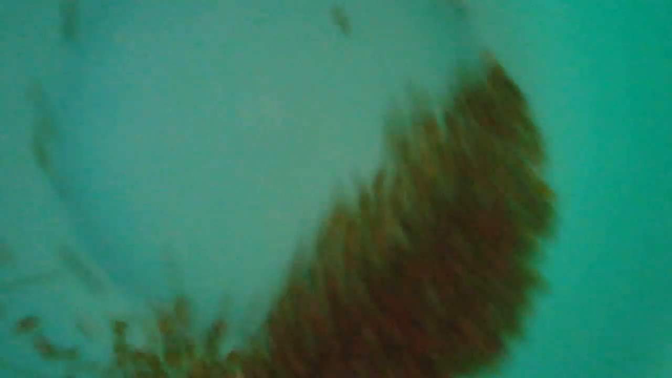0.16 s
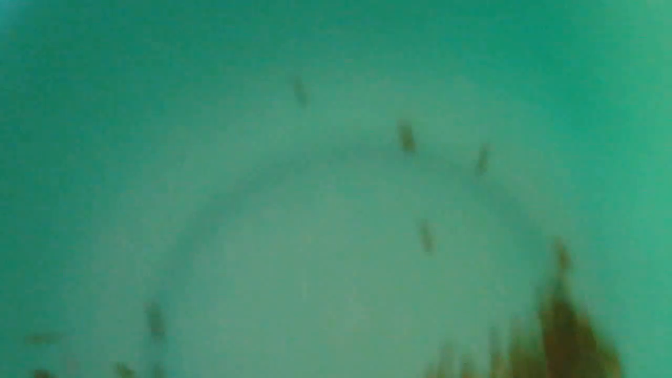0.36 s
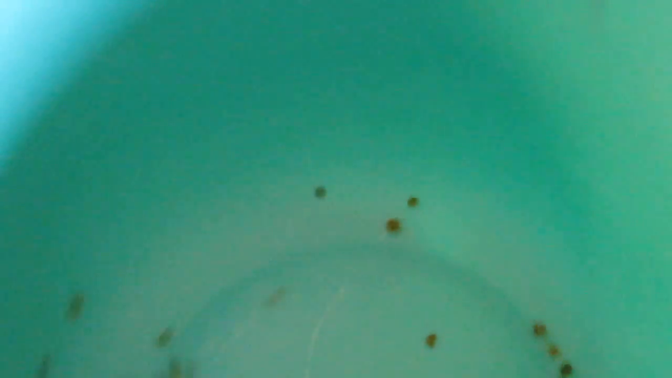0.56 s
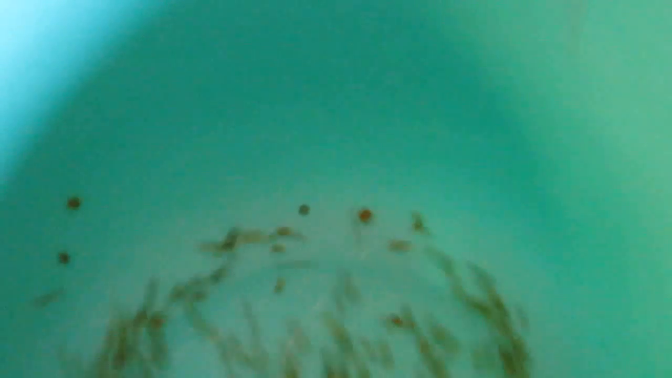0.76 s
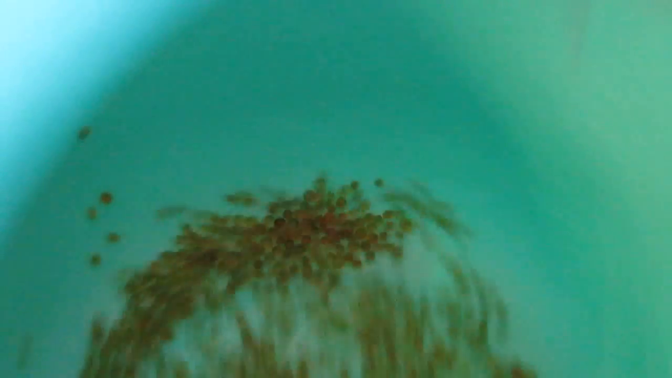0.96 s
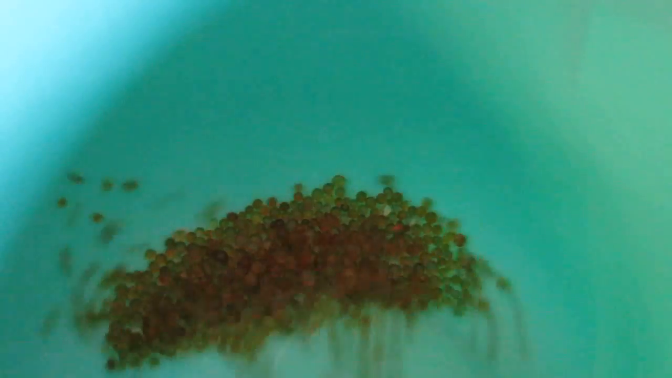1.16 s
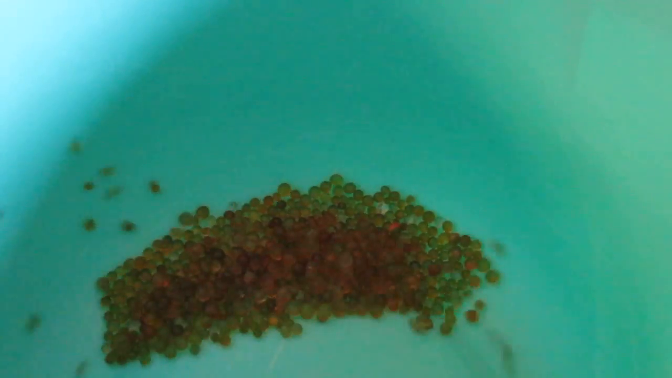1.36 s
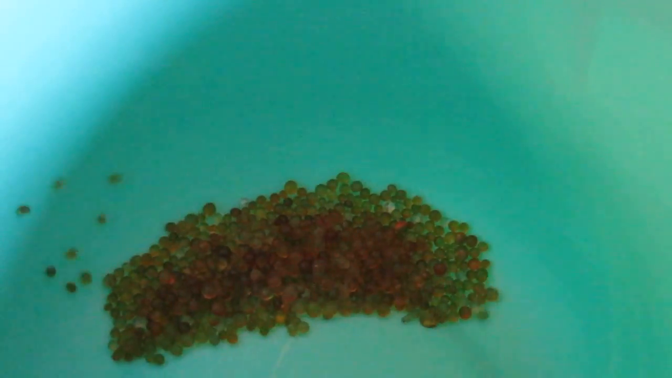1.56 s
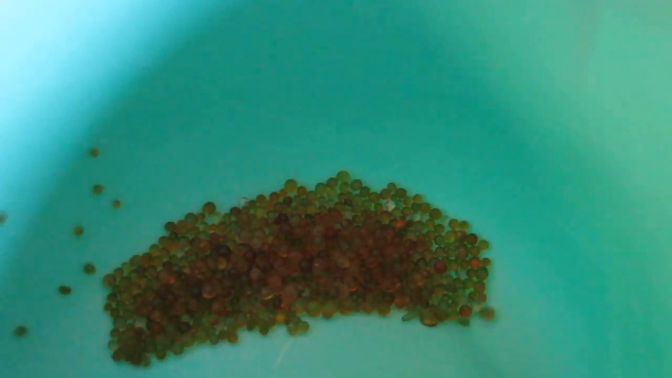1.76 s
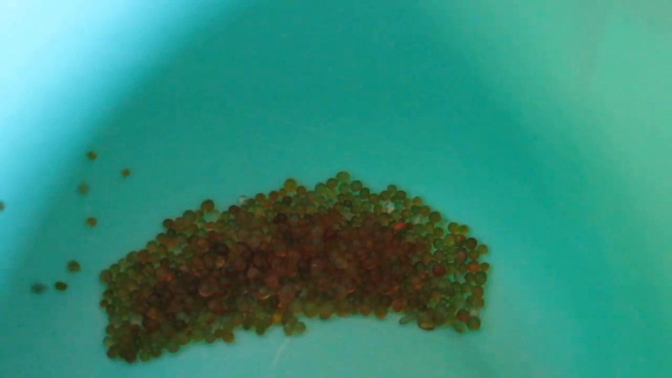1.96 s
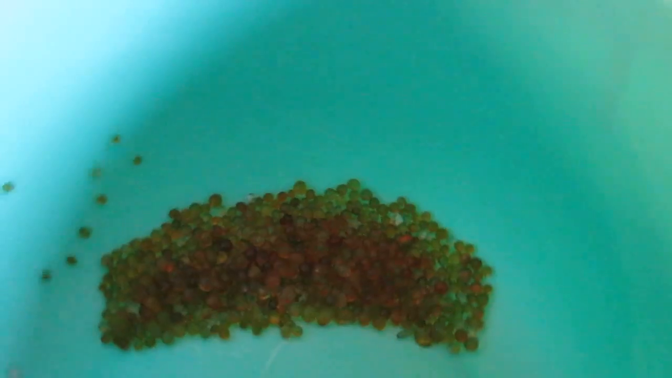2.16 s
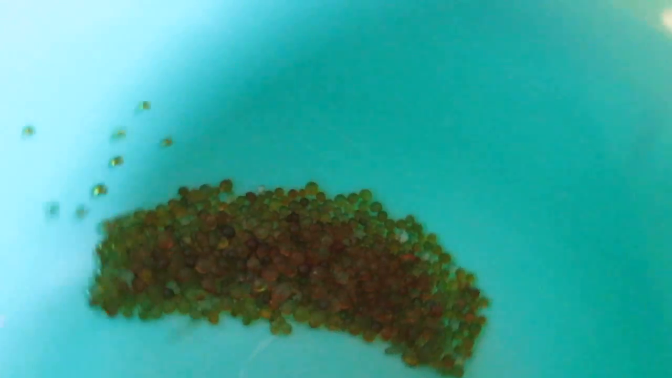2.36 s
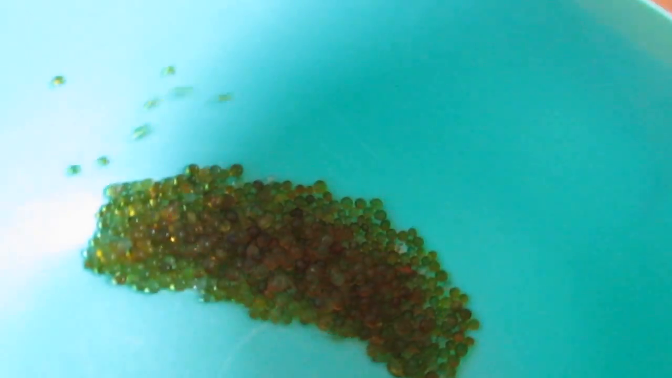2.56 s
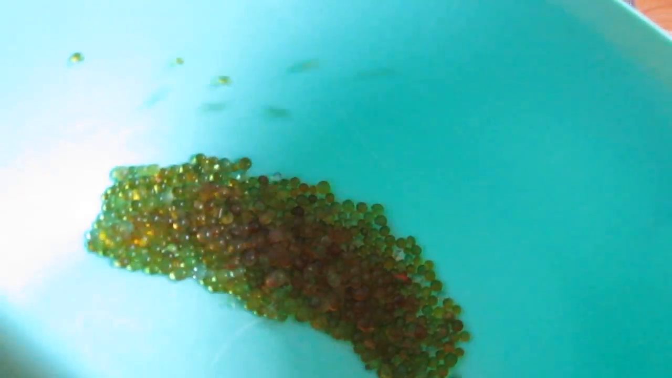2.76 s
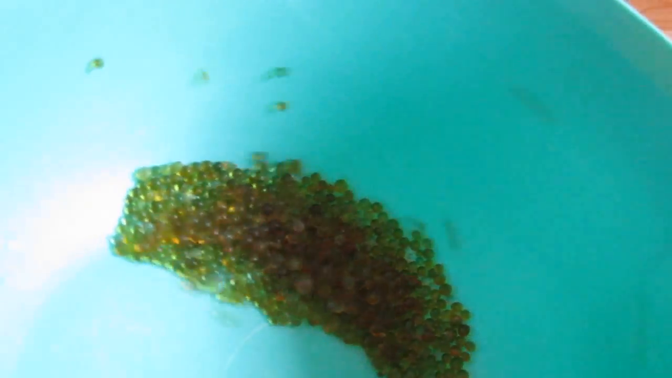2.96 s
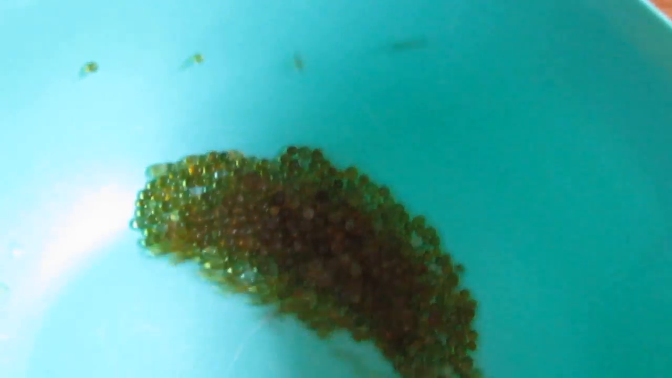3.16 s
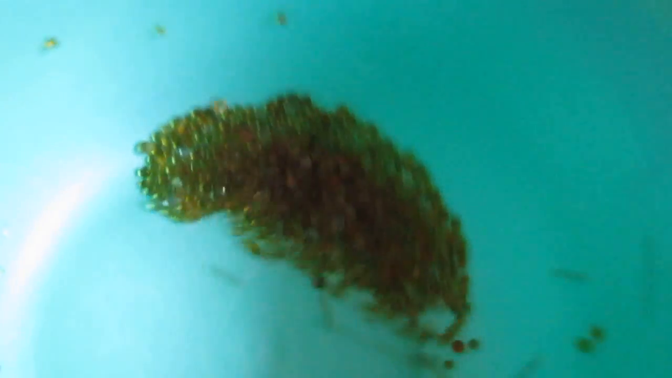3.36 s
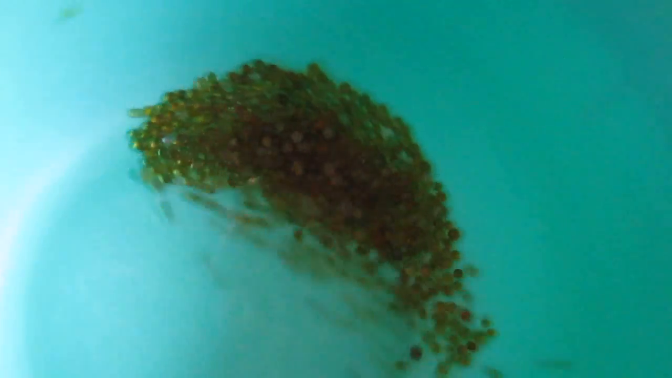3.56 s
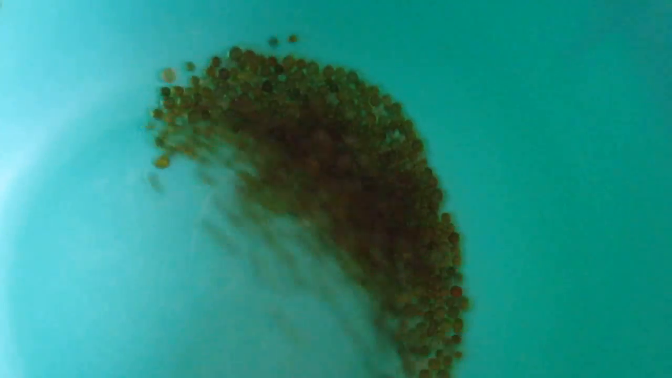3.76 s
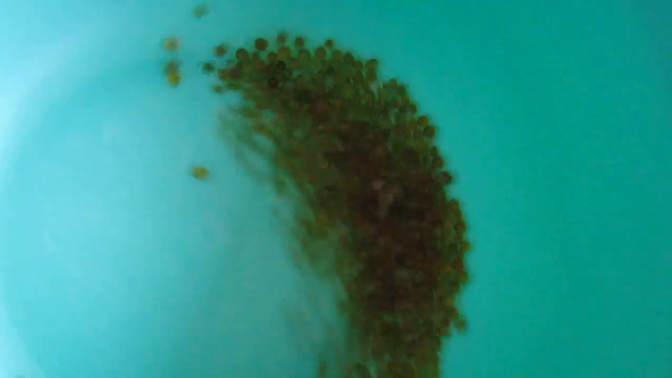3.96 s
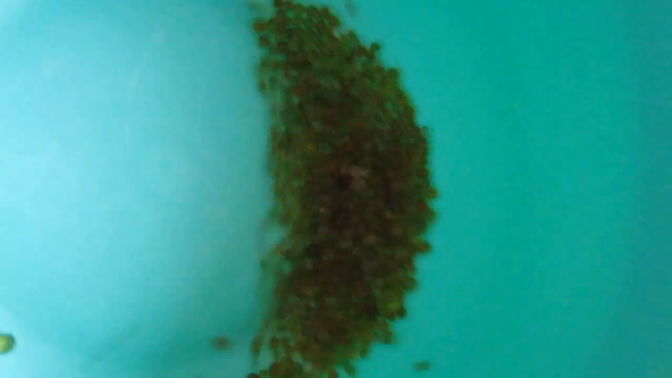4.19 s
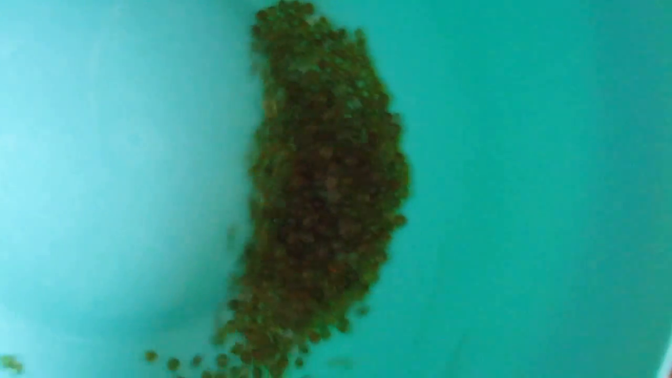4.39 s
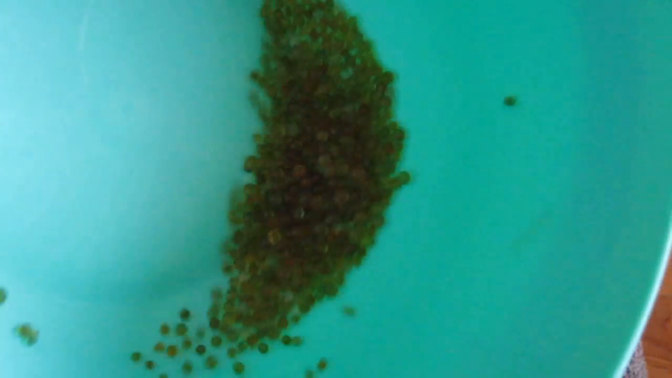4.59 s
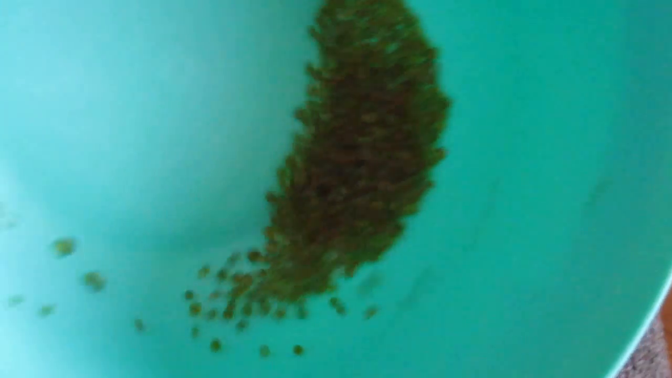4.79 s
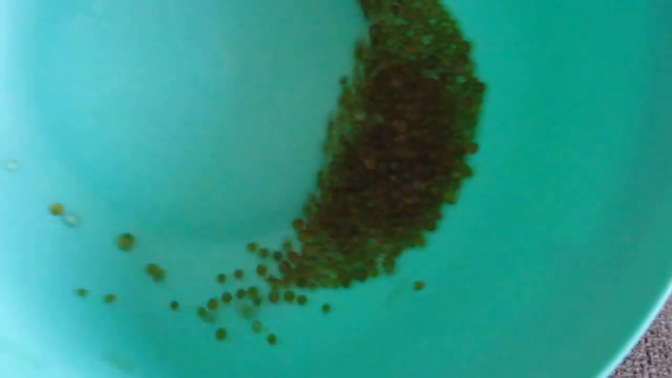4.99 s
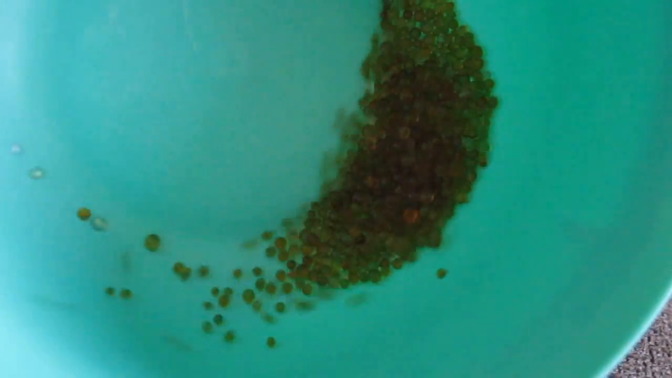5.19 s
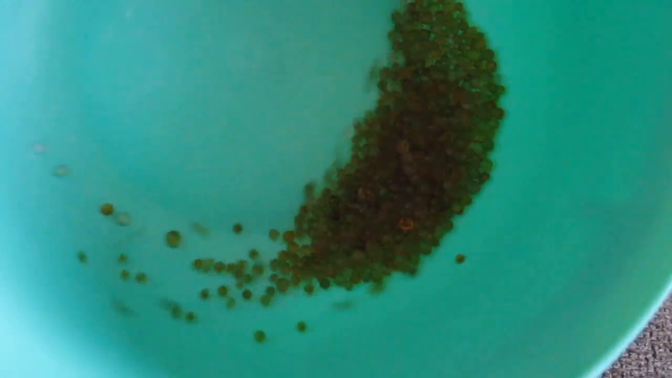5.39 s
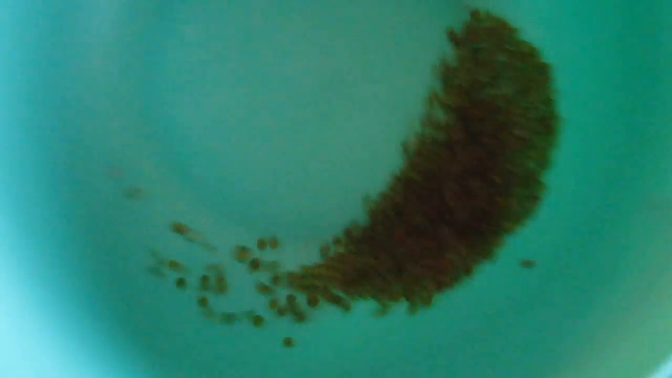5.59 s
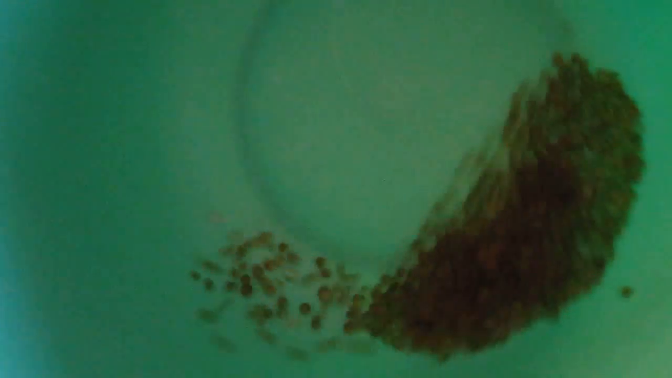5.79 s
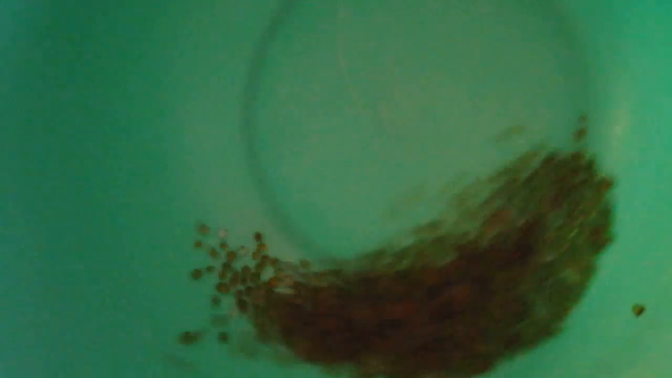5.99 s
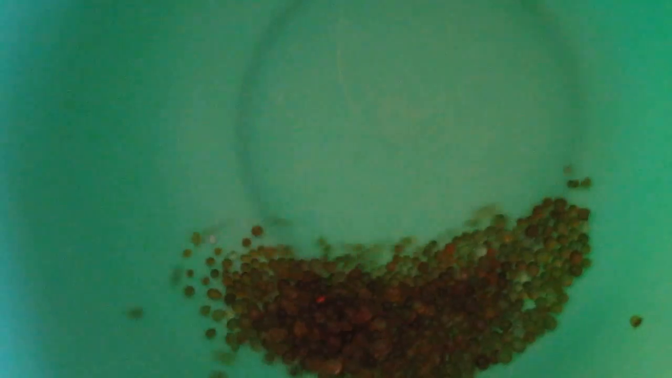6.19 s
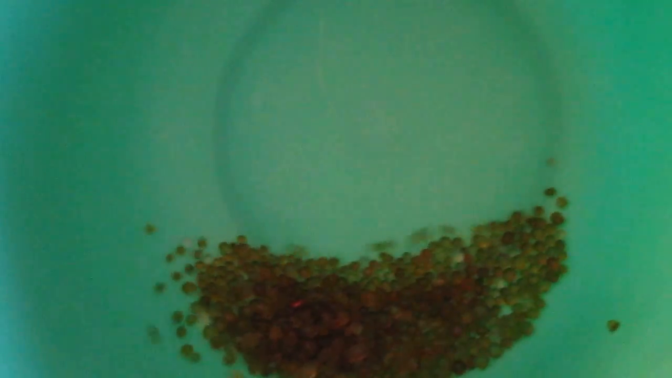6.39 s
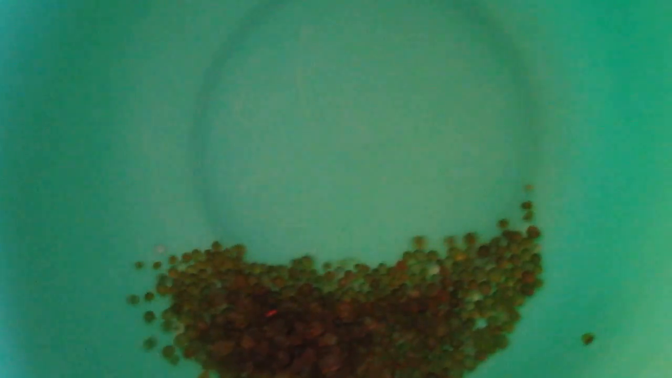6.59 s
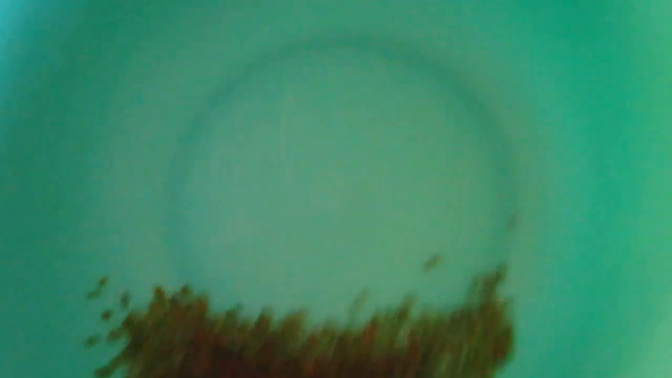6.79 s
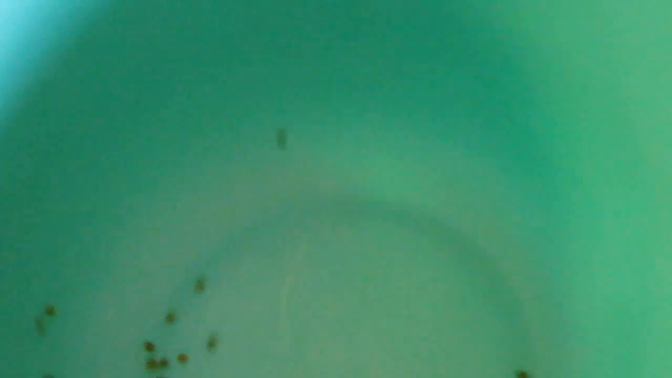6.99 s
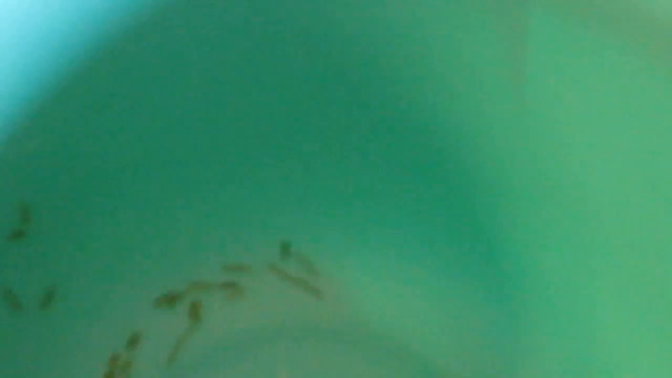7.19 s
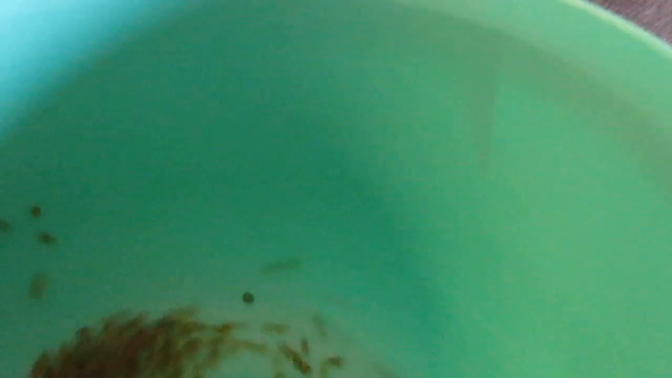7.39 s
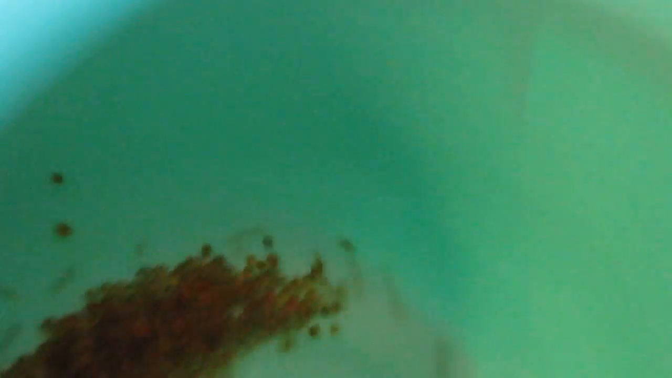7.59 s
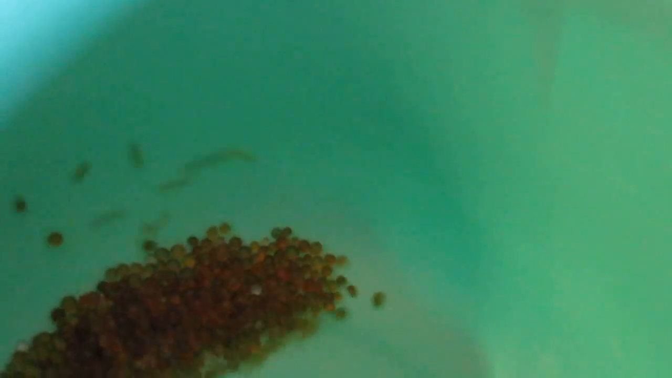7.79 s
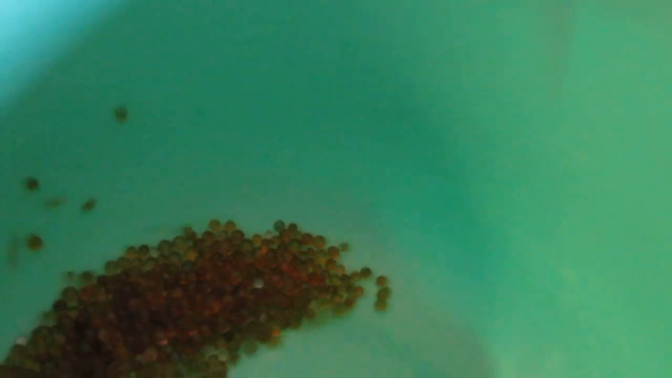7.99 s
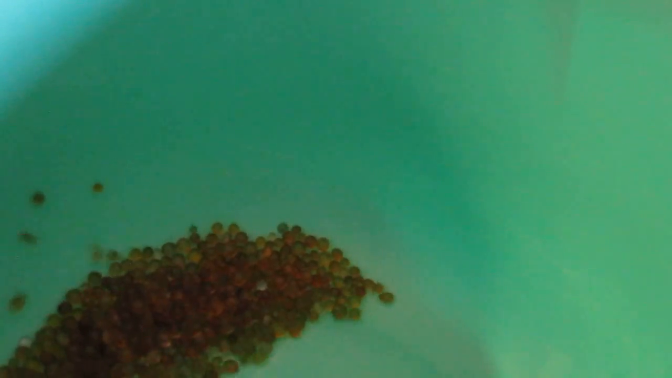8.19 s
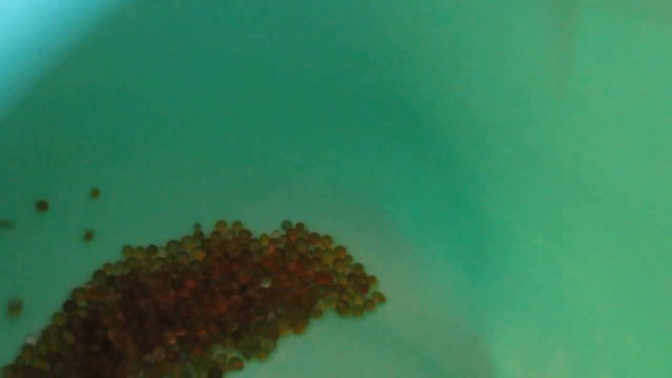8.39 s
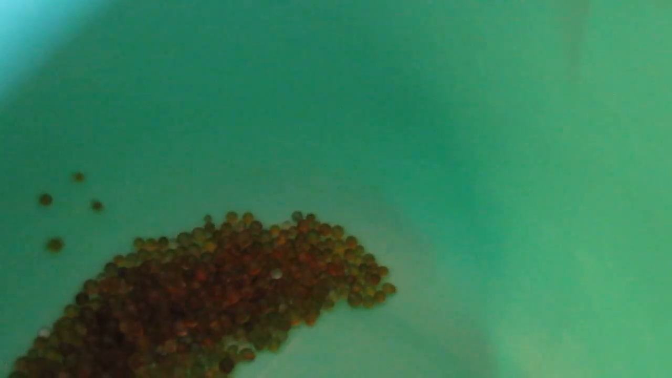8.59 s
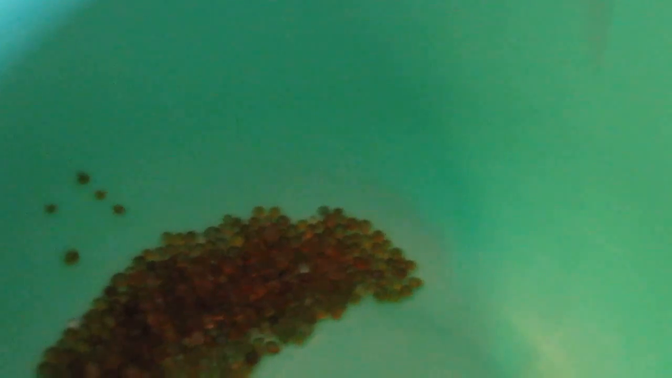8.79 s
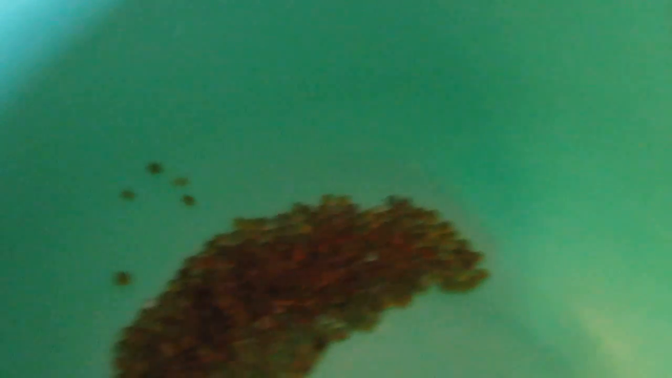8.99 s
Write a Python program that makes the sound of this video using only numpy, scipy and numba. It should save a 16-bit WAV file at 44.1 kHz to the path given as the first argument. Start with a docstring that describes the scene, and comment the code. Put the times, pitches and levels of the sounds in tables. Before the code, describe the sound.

A heap of beads rolls and clacks around a plastic bowl in repeated swells, each thinning to scattered clicks as it settles.

```python
"""A heap of small hard beads is swirled slowly round a plastic bowl. In the first swish the beads roll,
drum on the wall and clack together, and the bowl's ring changes with where the heap lies. Near 1.5 s
the heap settles and single beads tick. From about 3 s to 8 s come three more big swishes, each a dense
rattle that thins to separate clacks. At the end the packed heap slides with a faint hiss.
A quiet room hum and the soft rumble of hands on the bowl go on throughout."""
import sys
import numpy as np
from scipy import signal
from scipy.fft import rfft, irfft
from scipy.io import wavfile
from scipy.ndimage import uniform_filter1d
from numba import njit

SR = 44100
rng = np.random.default_rng(int(sys.argv[2]) if len(sys.argv) > 2 else 0)


def transcribe(u):
    """Save the signal u as a 16-bit wav file named by the first command-line argument.

    u: samples, shape (n,) or (channels, n), limited to [-1, 1]; the rate is SR.
    q: integer samples, one column per channel.
    """
    v = np.clip(np.atleast_2d(u).T, -1, 1)
    q = np.round(v * 32767).astype(np.int16)
    wavfile.write(sys.argv[1], SR, q)


N = 399105
TIME = np.arange(N) / SR
RING_SAMPLES = 4096   # length of the filters that colour each sound
GRID_HZ = np.maximum(np.arange(RING_SAMPLES // 2 + 1) * SR / RING_SAMPLES, 1)
FULL_ROLL_DB, FULL_CLACK_DB = -21, -21.5   # the levels that count as full flow

# tone colour of beads rolling on plastic: pitch_hz, level_db
ROLL_SPECTRUM = [(500, -30), (800, -5), (950, -11.5), (1100, -2), (2000, 2), (3000, 2.5), (4000, -5),
                 (5000, -4.5), (7000, -15.5), (16000, -34)]
# tone colour of a hard, head-on hit: pitch_hz, level_db
SNAP_SPECTRUM = [(1500, -28), (3200, 2), (5000, -11), (7000, -2.5), (9000, -2.5), (11500, 0), (13500, -5.5),
                 (17500, -18.5)]


def swirl():
    """Each swish builds, holds and runs out. Gives the rolling, clacking and drumming levels in dB."""
    # one tilt of the bowl per row: start_s, rise_s, hold_s, fall_s, roll_db, clack_db, drum_db, lag_s
    swishes = [(-0.42, 0.36, 0.14, 0.8, -19.6, -20.5, -28, 0.15),
               (-0.04, 0.68, 0.51, 0.47, -22, -21, -29.5, 0.087),
               (1.315, 0.33, 0.066, .4, -44, -51, -50.5, .003),
               (2.065, 0.35, 0.017, .1, -43.5, -46, -44, .003),
               (2.17, 0.42, 0.47, .26, -38, -33.2, -43, 0.13),
               (2.253, 1.157, 0.69, 1, -20, -21.5, -31.5, 0.0028),
               (4.096, 0.69, 0.055, .67, -26.5, -29.5, -35, 0.013),
               (4.833, 0.27, 0.24, .76, -29, -31, -38.5, 0.016),
               (4.917, 0.9, 0.24, 0.4, -21.5, -21, -33.5, .012),
               (6.092, 0.2, 0.081, 0.83, -36, -39, -38.5, .003),
               (6.559, 0.58, 0.42, 0.88, -22.4, -20.5, -32.5, 0.0026),
               (6.667, 0.068, 0.019, .08, -46, -40.5, -44, .003),
               (7.7, 0.32, 0.11, .17, -45, -49, -41, .003)]
    roll_power = clack_power = drum_power = 1e-9
    for start_s, rise_s, hold_s, fall_s, roll_db, clack_db, drum_db, lag_s in swishes:
        age_s = TIME - start_s
        building = np.clip(age_s / rise_s, 0, 1) ** 2.54
        running_out = np.clip((rise_s + hold_s + fall_s - age_s) / fall_s, 0, 1) ** 1.72
        flow = building * running_out
        piling = np.interp(TIME - lag_s, TIME, flow)   # beads roll first, then run into the heap
        roll_power += (from_db(roll_db) * flow) ** 2
        clack_power += (from_db(clack_db) * piling ** 1.16) ** 2
        drum_power += (from_db(drum_db) * flow) ** 2
    return 10 * np.log10([roll_power, clack_power, drum_power])


def rolling(level_db):
    """Beads bump along the plastic, more often the faster they roll."""
    flow = from_db(level_db - FULL_ROLL_DB)
    bumps = from_db(level_db) * contacts(per_s=200 + 12000 * flow, spread_db=3.5, even_s=0.11)
    return colour(scatter(bumps, fade_s=0.017, level_db=-5.5), ROLL_SPECTRUM)


def clacking(level_db):
    """Beads hit beads: a dense rattle in full flow, separate clacks when slow, and rarer bright snaps."""
    flow = from_db(level_db - FULL_CLACK_DB)
    tumble = avalanches(rate_hz=70, depth_db=2.4 - 1.3 * np.minimum(flow, 1))
    clacks = from_db(level_db) * tumble * contacts(per_s=50 + 5000 * flow, spread_db=3.5, even_s=0.13)
    clacks = scatter(clacks, fade_s=0.011, level_db=-9)
    snap_gain = from_db(level_db - 9) * flow ** 0.067   # slow beads snap less
    snaps = snap_gain * contacts(per_s=25 + 190 * flow, spread_db=2.5, even_s=0.2)
    snaps = scatter(snaps, fade_s=0.008, level_db=-5)
    # tone colour of bead against bead: pitch_hz, level_db
    clack_spectrum = [(600, -32.5), (2000, -5.5), (3200, -3.5), (4600, 1.5), (6000, -1), (7000, -2.5),
                      (8500, -1), (11000, -4.5), (13000, -8), (15000, -12.5), (17500, -18)]
    return colour(clacks, clack_spectrum) + colour(snaps, SNAP_SPECTRUM)


def avalanches(rate_hz, depth_db):
    """A gain that wanders as little avalanches come and go; its average power is 1."""
    points = rng.standard_normal(2000)
    gain = from_db(depth_db * np.interp(TIME * rate_hz, np.arange(len(points)), points))
    return gain / np.sqrt(np.mean(gain ** 2))


def bowl(force, place):
    """The bowl boosts the pitches it likes to ring at, by amounts that depend on where the heap lies."""
    # the bowl's resonances, and their boost with the heap at each of four places:
    # pitch_hz, width_hz, bottom_db, far_wall_db, side_wall_db, near_wall_db
    resonances = np.array([(1131, 118, 4, -3.5, 11, 2.5), (1276, 170, 0, 4, 7, 0.5),
                           (1472, 172, 10, 7.5, 2.5, 4), (1700, 260, 0.5, 0.5, -4, 1.5),
                           (1925, 135, 0.5, 4.5, 0, 6.5), (2215, 145, 8.5, 5, 3, 11),
                           (2470, 330, -0.5, 0, 4.5, -4), (2984, 133, 8.5, 8, -3.5, 11),
                           (3200, 185, 6.5, 5.5, -1, 12), (3447, 213, 8, 7, 3.5, 12),
                           (3746, 280, 7.5, 8.5, 5.5, 4.5), (4010, 300, 0.5, 0.5, 0, 9.5),
                           (4990, 920, 8, 5, -2.5, 4), (5320, 390, -3, -8.5, -0.5, -4),
                           (5600, 820, 9, 4, -5.5, 7), (6015, 690, 3.5, -1, 9, 5),
                           (6520, 770, 8, 5, -1, -1.5), (7540, 1660, 1, 4.5, -0.5, 3.5)])
    pitch_hz, width_hz, boosts_db = resonances[:, :1], resonances[:, 1:2], resonances[:, 2:].T
    peaks = 2 ** -((2 * (GRID_HZ - pitch_hz) / width_hz) ** 2)
    roll_power = from_db(shape_db(ROLL_SPECTRUM)) ** 2
    out = 0
    for k, boost_db in enumerate(boosts_db):
        distance = np.abs((place - k + 2) % 4 - 2)   # the shorter way round the four places
        ring = click_response(boost_db @ peaks)
        # the colour changes, the loudness stays
        ring /= np.sqrt(np.average(np.abs(rfft(ring)) ** 2, weights=roll_power))
        out = out + through(force * np.maximum(1 - distance, 0), ring)
    return out


def wall_bending(roll_db, place):
    """The wall flexes with a low tone. Rolling beads weigh on it less, so the tone rises and blurs."""
    # the tone with the heap resting at the bottom, far wall, side wall, near wall: pitch_hz, level_db
    resting_tones = [(531, -3), (457, -3.5), (500, -2), (508, -4.5)]
    resting_hz, tone_db = (np.interp(place, np.arange(4), column, period=4)
                           for column in np.transpose(resting_tones))
    flow = from_db(roll_db - FULL_ROLL_DB)
    pitch_hz, width_hz = resting_hz + 36.7 * flow, 62 + 112 * flow
    return pitch_hz, width_hz, tone_db


def drumming(level_db, pitch_hz, width_hz, tone_db):
    """The weight of the rolling beads shakes the wall: a broad low patter and a hollow tone."""
    # tone colour of the shaken wall: pitch_hz, level_db
    drum_spectrum = [(120, -42.5), (230, -27.5), (275, -9), (312, 3.5), (345, -2), (395, -1.5), (500, -2),
                     (700, 0.5), (830, -8), (950, -7), (1300, -30.5)]
    patter = colour(contacts(per_s=6000, spread_db=1.0, even_s=0.04), drum_spectrum)
    bumps = contacts(per_s=4600, spread_db=2.5, even_s=0.046)
    turn = 2 * np.pi * pitch_hz / SR
    keep = np.exp(-np.pi * np.abs(width_hz) / SR)
    tone = gliding_ring(bumps, turn, keep)
    tone = gliding_ring(tone, turn, keep) * np.sqrt(2 * (1 - keep))   # a second pass makes it purer
    return from_db(level_db) * (from_db(-4) * patter + from_db(tone_db) * tone)


def strikes():
    """A lone bead gives a tick a few cycles long and a hard crack, and the wall rings on."""
    # single beads striking, with levels before the final mix: start_s, tick_db, knock_db
    lone_hits = [(0.7085, -3, -13), (1.3583, -6, -23), (1.37, -3, -19.5), (1.3924, -9, -26),
                 (1.4364, -16, -27), (1.4778, -15, -29), (1.513, -19, -28), (1.5579, -21, -33.5),
                 (1.7404, -21, -38), (1.7534, -24, -38), (1.8407, -33, -41), (2.35, -20, -37),
                 (2.366, -32, -42), (2.396, -21, -36), (2.4024, -21, -39), (2.4204, -26, -32),
                 (2.5574, -24, -35), (2.5837, -24, -29), (2.625, -15, -28), (2.664, -11, -30),
                 (2.6917, -6, -26), (2.7492, -7, -32), (2.9876, -5.5, -28), (3.0864, -9, -20),
                 (3.144, -3, -26), (3.2101, -2, -20), (6.179, -14, -26), (6.459, -17, -24),
                 (6.5011, -18, -27), (6.563, -35, -30), (6.5964, -32, -27), (6.9122, -10, -25),
                 (6.976, -13, -23), (7.8588, -7, -28.5), (7.9666, -10, -31), (8.032, -10, -26),
                 (8.0506, -12.5, -35), (8.099, -15, -35), (8.1585, -20, -34), (8.1911, -4.5, -25),
                 (8.2064, -9.5, -26), (8.2794, -23, -39), (8.305, -29, -48)]
    tick_hz, rise_s, decay_s = 6470, 0.00004, 0.00012
    ticks, cracks, knocks = np.zeros((3, N))
    t = np.arange(256) / SR
    envelope = np.exp(-t / decay_s) * (1 - np.exp(-t / rise_s))
    envelope /= envelope.max()
    for start_s, tick_db, knock_db in lone_hits:
        at = int(start_s * SR)
        pitch_hz = tick_hz * np.exp(0.06 * rng.standard_normal())   # each bead is a little different
        ticks[at:at + len(t)] += from_db(tick_db) * np.sin(2 * np.pi * pitch_hz * t) * envelope
        cracks[at], knocks[at] = from_db(tick_db), from_db(knock_db)
    cracks = colour(scatter(cracks, fade_s=0.012, level_db=2), SNAP_SPECTRUM)
    ring = wall_ring(scatter(knocks, fade_s=0.014, level_db=-7))
    hits = from_db(5) * ticks + from_db(-0.5) * cracks + from_db(3) * ring
    # so light a bead hardly stirs the wall's low tones
    return signal.sosfilt(signal.butter(3, 2300, "high", fs=SR, output="sos"), hits)


def wall_ring(knocks):
    """Knocks set the wall's clearest tones ringing."""
    # the wall's ring after one bead: pitch_hz, level_db, fade_s (time to fall by 60 dB)
    wall_tones = [(1950, -8, 0.033), (2300, -9, 0.04), (3090, -2.5, 0.026), (3335, -5, 0.026),
                  (3470, -7, 0.03), (5100, -3.5, 0.015), (5820, -5.5, 0.014)]
    t, ring = np.arange(RING_SAMPLES) / SR, 0
    for pitch_hz, level_db, fade_s in wall_tones:
        ring = ring + from_db(level_db - 60 * t / fade_s) * np.sin(2 * np.pi * pitch_hz * t)
    return through(knocks, ring)


def stray_beads(per_s, level_db):
    """Even at rest, stray beads nudge the wall now and then."""
    nudges = (rng.random(N) < per_s / SR) * rng.uniform(-0.48, 1, N)
    return from_db(level_db) * wall_ring(nudges)


def sliding():
    """The packed heap slips over the plastic with a faint, even hiss."""
    # the hiss swells as the whole heap starts to slide: time_s, level_db
    hiss_levels = [(8.55, -85), (8.7, -61), (8.87, -52), (9.05, -55)]
    # tone colour of the hiss: pitch_hz, level_db
    hiss_spectrum = [(1500, -20), (3500, -7), (5000, 4), (7500, 1), (10500, 3), (13000, -7), (17000, -19)]
    return from_db(over_time(hiss_levels)) * colour(rng.standard_normal(N), hiss_spectrum)


def hands(holding_db, fade_s):
    """Hands on the bowl rumble softly, and louder when they shift their grip."""
    # shifts of grip: start_s, length_s, level_db
    grips = [(1.494, 1.17, -51.5), (2.7, 0.77, -56), (3.964, 0.55, -43.5), (7.382, 0.23, -56)]
    # tone colour of the rumble: pitch_hz, level_db
    rumble_spectrum = [(80, -18), (155, 2), (230, 3.5), (320, 3), (500, -10), (900, -58)]
    gain = from_db(holding_db)
    for start_s, length_s, level_db in grips:
        inside_s = np.minimum(TIME - start_s, start_s + length_s - TIME)
        gain = np.maximum(gain, from_db(level_db) * np.clip(inside_s / fade_s, 0, 1))
    return gain * colour(rng.standard_normal(N), rumble_spectrum)


def room_echo(sound, fade_s, level_db):
    """The direct sound is followed by a spray of echoes that falls by 60 dB in fade_s."""
    t = np.arange(int(fade_s * SR) + 2) / SR
    echoes = rng.standard_normal(len(t)) * from_db(-60 * t / fade_s) * (t > 0.0004)
    echoes *= from_db(level_db) / np.linalg.norm(echoes)
    echoes[0] = 1   # the direct sound
    return through(sound, echoes)


def room_hum(level_db):
    """The room hums and hisses steadily."""
    # tone colour of the room's noise: pitch_hz, level_db
    room_spectrum = [(20, -0.5), (38, 4), (60, 0.5), (120, -3), (250, -4), (480, -4), (700, -5), (950, -1),
                     (1110, 7), (1450, -4), (2300, -3), (2600, -8), (3050, -3.5), (4000, -13.5),
                     (9000, -20), (17000, -33)]
    return from_db(level_db) * colour(rng.standard_normal(N), room_spectrum)


def contacts(per_s, spread_db, even_s):
    """Random clicks of uneven size; their power over even_s seconds stays near 1."""
    sizes = from_db(spread_db * np.minimum(rng.exponential(1, N), 4.5)) * rng.choice([-1, 1], N)
    clicks = sizes * (rng.random(N) < per_s / SR)
    window = int(even_s * SR) + 1
    power = uniform_filter1d(uniform_filter1d(clicks ** 2, window), window)
    return clicks / np.sqrt(np.maximum(power, 1e-4))


def scatter(clicks, fade_s, level_db):
    """Every click gets its own spray of echoes, which falls by 60 dB in fade_s."""
    keep = from_db(-120 / (fade_s * SR))
    power = signal.lfilter([1 - keep], [1, -keep], clicks ** 2 + 1e-18)
    return clicks + from_db(level_db) * np.sqrt(power) * rng.standard_normal(N)


@njit
def gliding_ring(force, turn, keep):
    """A ring that can glide: each sample it turns by an angle and keeps a share of its size."""
    out, state = np.zeros(len(force)), 0j
    for i in range(len(force)):
        push = force[i] * np.sqrt(2 * (1 - keep[i] ** 2))   # scaled so white noise keeps its power
        state = state * keep[i] * np.exp(1j * turn[i]) + push
        out[i] = state.real
    return out


def from_db(db):
    """Turn decibels into a gain."""
    return 10 ** (np.asarray(db) / 20)


def over_time(points):
    """Join (time_s, value) points with straight lines, giving one value per sample."""
    time_s, values = np.transpose(points)
    return np.interp(TIME, time_s, values)


def shape_db(spectrum):
    """Join (pitch_hz, level_db) points with straight lines on a scale of octaves."""
    pitch_hz, level_db = np.transpose(spectrum)
    return np.interp(np.log(GRID_HZ), np.log(pitch_hz), level_db)


def click_response(curve_db):
    """The quickest ring that has this spectrum (minimum phase), scaled to an energy of 1."""
    cepstrum = irfft(np.log(from_db(curve_db)))
    # fold the second half onto the first, so nothing sounds before the click
    cepstrum[1:RING_SAMPLES // 2] *= 2
    cepstrum[RING_SAMPLES // 2 + 1:] = 0
    ring = irfft(np.exp(rfft(cepstrum)))
    return ring / np.linalg.norm(ring)


def through(sound, ring):
    """Let every sample of a sound set off a copy of the ring."""
    return signal.oaconvolve(sound, ring)[:N]


def colour(sound, spectrum):
    """Filter a sound to give it the tone colour of a spectrum."""
    return through(sound, click_response(shape_db(spectrum)))


def scene():
    """The beads close by, in a small dry room."""
    # where the heap lies: time_s, place (0 bottom, 1 far wall, 2 side wall, 3 near wall, 4 bottom...)
    route = [(0, 2.45), (.22, 2.76), (.6, 3.68), (1.25, 4.56), (1.6, 4.65), (3.0, 4.96), (3.5, 5.3),
             (4.0, 5.83), (5.3, 6.37), (5.8, 6.68), (6.6, 6.7), (6.9, 7.1), (7.15, 7.8), (7.65, 8.67),
             (8.1, 9), (9.05, 7)]
    place = over_time(route)
    roll_db, clack_db, drum_db = swirl()
    beads = drumming(drum_db, *wall_bending(roll_db, place))
    beads += bowl(rolling(roll_db) + clacking(clack_db), place)
    beads += strikes() + stray_beads(per_s=20, level_db=-39.5) + sliding()
    beads = room_echo(beads, fade_s=0.2, level_db=-19)
    background = room_hum(level_db=-44) + hands(holding_db=-61.5, fade_s=0.087)
    return (beads + background)[None]


def record(dry):
    """The tallest peaks are rounded off and the very highest treble is cut."""
    treble_cut = signal.ellip(10, 0.2, 70, 17600, fs=SR, output="sos")
    return signal.sosfilt(treble_cut, np.tanh(dry))


dry = scene()
out = record(dry)
transcribe(out)
```